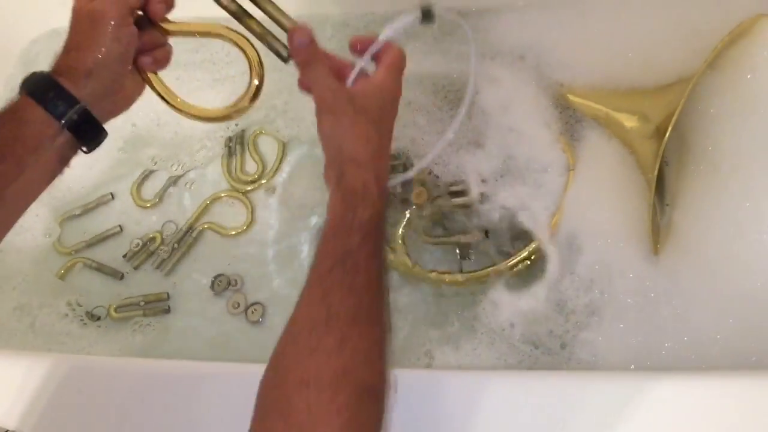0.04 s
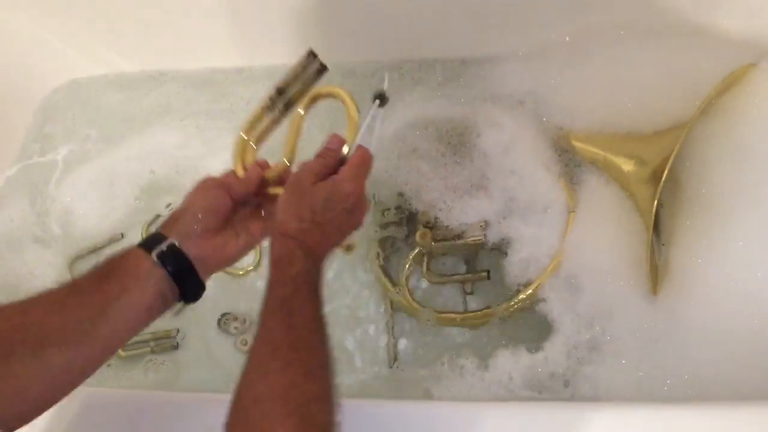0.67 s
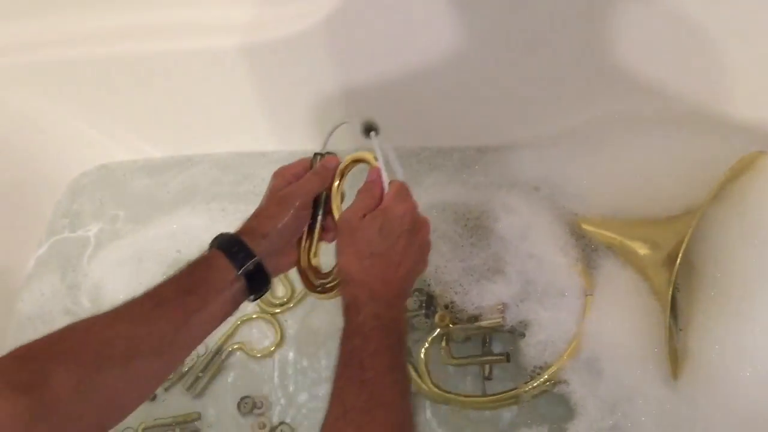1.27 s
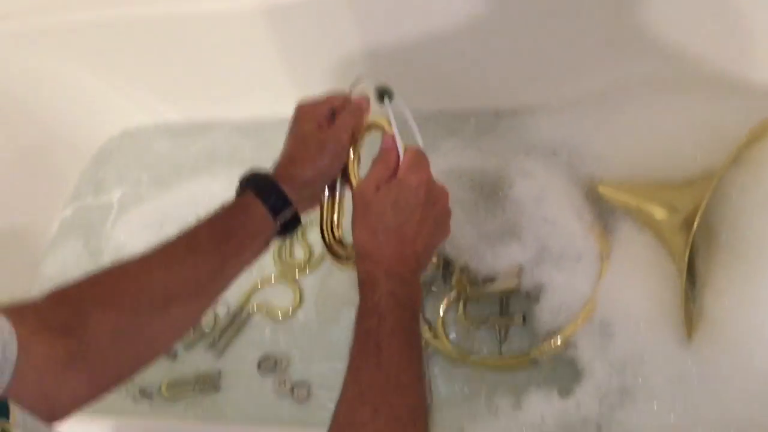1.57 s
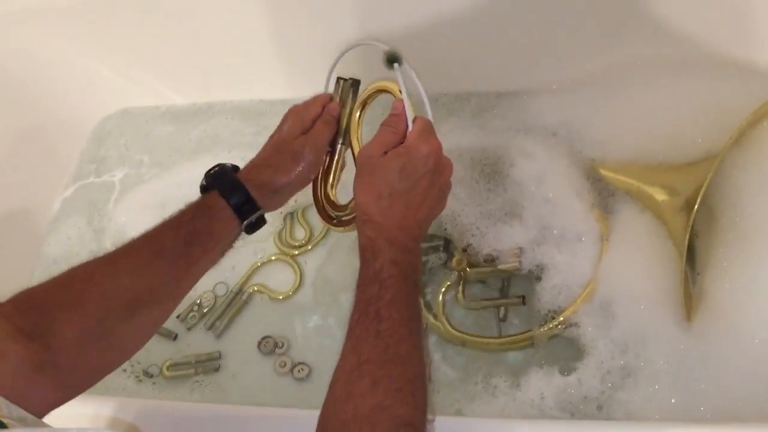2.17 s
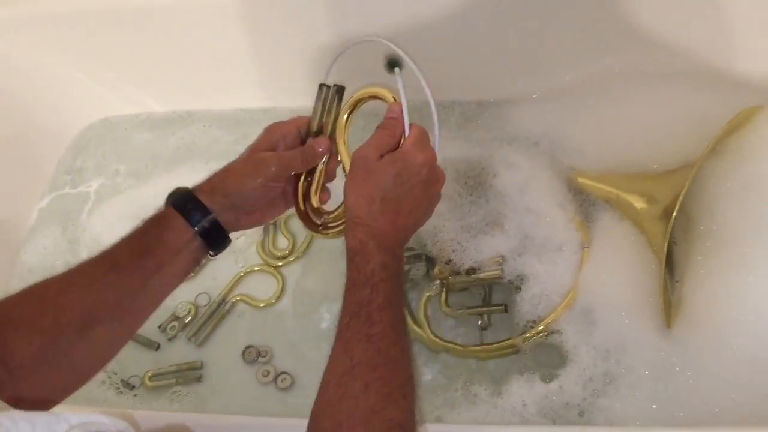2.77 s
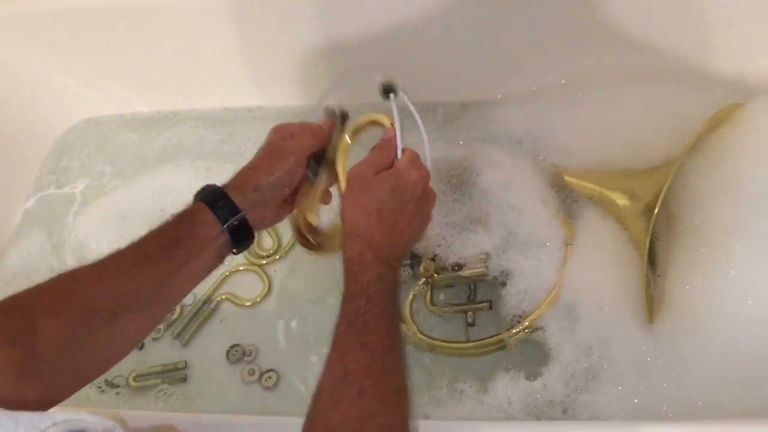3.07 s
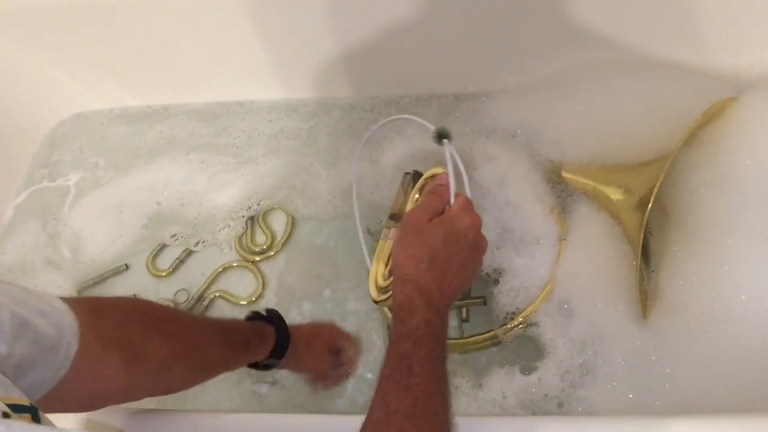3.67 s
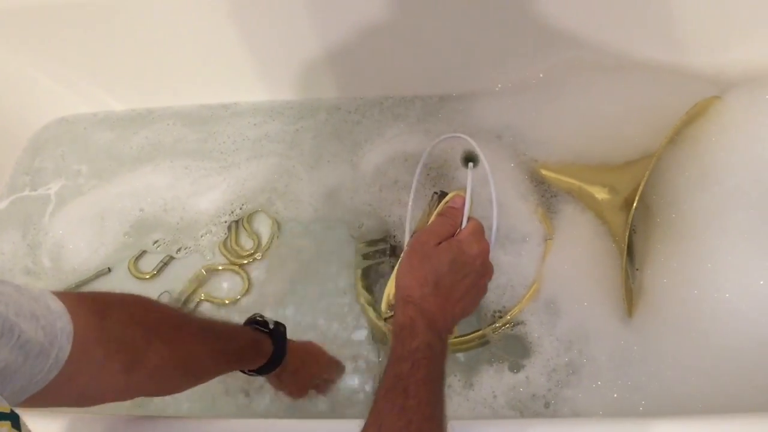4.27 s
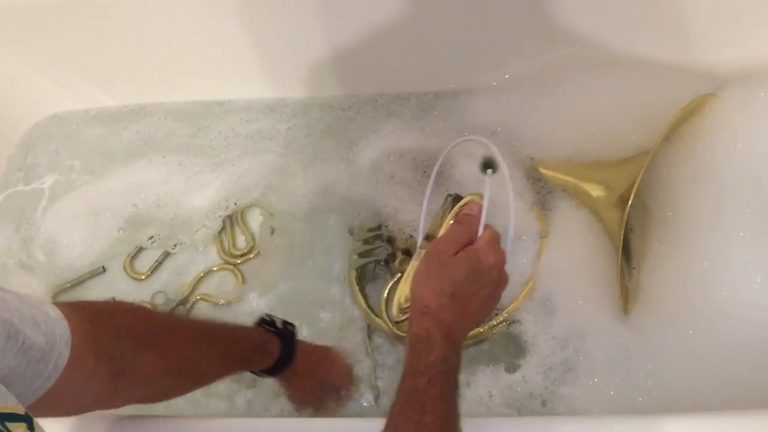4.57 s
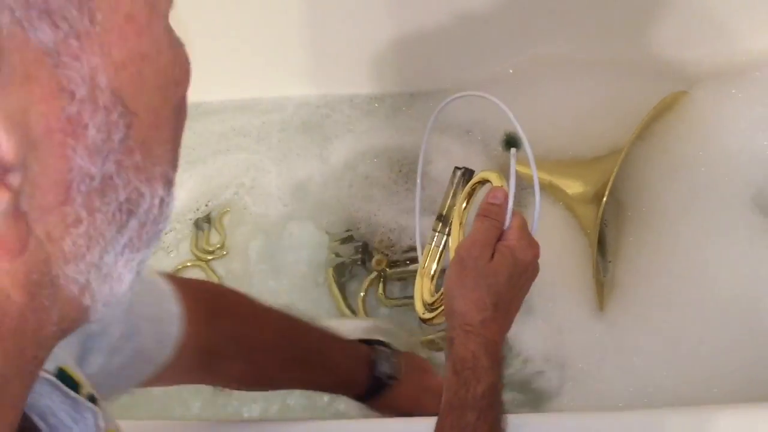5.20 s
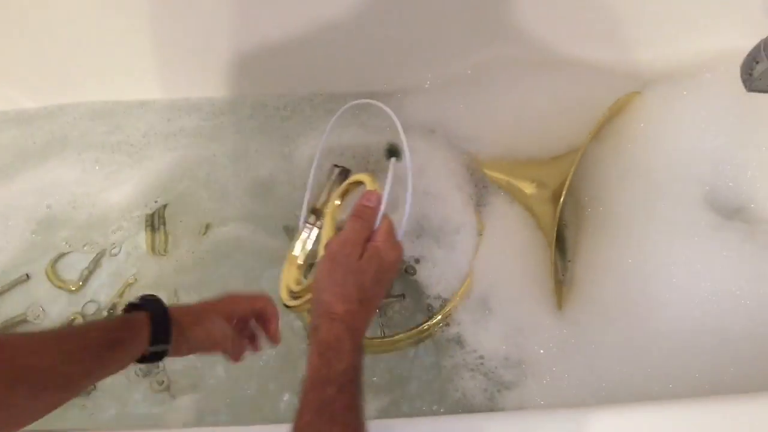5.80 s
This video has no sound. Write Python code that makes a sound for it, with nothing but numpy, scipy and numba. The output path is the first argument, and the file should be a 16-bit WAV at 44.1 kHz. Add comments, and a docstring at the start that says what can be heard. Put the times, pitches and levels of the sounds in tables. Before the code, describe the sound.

The sound opens with a hand splashing out of a filled bathtub: bright slaps, bubbly plops and spray during the first half second, with soft low thumps from the tub underneath. Wet brass tubing clinks lightly at about 0.4 and 0.8 seconds. From 1 to 3.5 seconds it is much quieter, with only a few isolated drips, tiny metal ticks and a faint low room rumble with hiss. At about 3.6 seconds the hand starts stirring the water again, making a run of uneven splashes, gurgles and falling droplets, strongest around 4.2 to 4.5 seconds. Deeper sloshes follow between 5 and 5.5 seconds, then a few small splashes and plops near 5.8 seconds. Everything is heard from one microphone beside the tub, with the short echo of a small, hard bathroom.

```python
"""A small hard bathroom, one microphone by a filled tub in which hands rinse brass tubing.
A hand lifts out of the water, a few drops fall, then it stirs and splashes. The water is heard as
ringing air bubbles of all sizes, slaps and fine spray; the wet tubing ticks and clinks. The tub walls
and the room echo these sounds, while soft thumps of the tub and a faint room tone lie underneath."""
import sys
import numpy as np
from scipy import signal
from scipy.fft import rfft, irfft, next_fast_len
from scipy.io import wavfile
from scipy.ndimage import uniform_filter1d
from numba import njit

SR = 44100
rng = np.random.default_rng(int(sys.argv[2]) if len(sys.argv) > 2 else 0)


def persist_wave(psi):
    """Save psi, clipped to +-1, as 16-bit WAV."""
    counts = np.round(np.clip(psi, -1, 1) * 32767).astype(np.int16)
    wavfile.write(sys.argv[1], SR, np.atleast_2d(counts).T)


N = 257788
TIME = np.arange(N) / SR


def undb(db):
    """Decibels to gain."""
    return 10 ** (np.asarray(db) / 20)


def unit(x):
    """Scale to rms 1."""
    return x / np.sqrt(np.mean(x ** 2))


def at_hz(hz, points):
    """Read (Hz, value) points on a log-frequency axis."""
    f, value = np.transpose(points)
    return np.interp(np.log(np.maximum(hz, 1)), np.log(f), value)


def shaped(x, gain):
    """Filter by a gain that is a function of frequency."""
    size = next_fast_len(len(x) + SR // 4)
    hz = np.arange(size // 2 + 1) * SR / size
    return irfft(rfft(x, size) * gain(hz), size)[:len(x)]


def resonance(f, hz, width):
    """Response of one resonance, gain 1 at its centre."""
    return 1j * f * width / (hz ** 2 - f ** 2 + 1j * f * width)


def fade(t, t60):
    """Exponential decay by 60 dB in t60 seconds."""
    return np.exp(-np.log(1000) * t / t60)


def add(out, start, sound):
    """Mix a sound in at a start time in seconds."""
    i = max(int(start * SR), 0)
    out[i:i + len(sound)] += sound[:max(N - i, 0)]


@njit
def ring_bubbles(starts, hz, t60, gain, glide, swell_cycles):
    """Bubbles ring as damped sines that swell, then rise in pitch as they near the surface."""
    out = np.zeros(N)
    for k in range(len(starts)):
        first, length = int(starts[k] * SR), t60[k] * SR
        phase, amplitude, decay = 0., gain[k], np.exp(-6.9 / length)
        for i in range(min(int(length), N - first)):
            phase += 2 * np.pi * hz[k] * (1 + glide[k] * i / length) / SR
            amplitude *= decay
            swell = min(phase / (2 * np.pi * swell_cycles[k]), 1.)
            out[first + i] += amplitude * np.sin(phase) * swell ** 2 * (3 - 2 * swell)
    return out


def swarm(spectrum, count, cycles, scatter_db, glide):
    """Bubbles of random sizes, born at random moments, each ringing for about `cycles`; rms 1."""
    when, pitch, life, loudness, rise = rng.random((count, 5)).T
    low, high = spectrum[0][0], spectrum[-1][0]
    hz = low * (high / low) ** pitch
    t60 = cycles * (.5 + life) / hz
    boost_db = -scatter_db * np.log(np.maximum(loudness, np.exp(-4)))  # a few stand out
    gain = undb(at_hz(hz, spectrum) + boost_db) / np.sqrt(t60)
    swell_cycles = np.full(count, 1.71)
    return unit(ring_bubbles(when * N / SR, hz, t60, gain, glide * rise, swell_cycles))


def surge(starts, rises, falls, levels_db):
    """Each stroke swells steadily and dies away; overlapping strokes add in power."""
    power = np.zeros(N)
    for start, rise, fall, db in zip(starts, rises, falls, levels_db):
        t = TIME[:2 * SR] + max(-start, 0)
        envelope = undb(db) * np.minimum(t / rise, 1) * fade(np.maximum(t - rise, 0), fall)
        add(power, start, envelope ** 2)
    return np.sqrt(power)


def stirring():
    """The hand folds in air and throws spray; deep strokes make large bubbles and heave the water."""
    # Spectra of small and large bubbles, spray, droplets falling back and water heaving against the tub.
    # Each row: frequency in Hz, relative level in dB.
    small_spectrum = [(820, -7.5), (1050, 4.5), (1450, 6.5), (1900, 2), (2500, 2.5), (3200, -8)]
    large_spectrum = [(480, -11), (560, -11), (680, -6.5), (850, -5)]
    spray_spectrum = [(2800, 7.5), (4500, 1), (7000, -6), (11000, -8.5), (16000, -12)]
    droplet_spectrum = [(2600, -9), (4000, 7.5), (6000, 6.5), (8500, 4), (11000, 0.5), (14000, 5)]
    heave_spectrum = [(70, -10), (112, -8), (160, -1), (200, -1), (240, -2), (320, 1), (470, 0)]
    # Strokes of hand or tubing through the water. Each row: start in seconds, rise and fall (t60) in
    # seconds, level of the small bubbles in dB, then large bubbles, heave and spray in dB relative to it.
    strokes = [(-.05, 0.03, 0.45, -37.5, -15.5, -1, -4), (0.021, 0.02, 0.59, -46, -25, -28, 8.5),
               (0.109, 0.031, 0.15, -36, -28, -13, 3.5), (0.183, 0.0077, 0.48, -37, -2, 5.5, -5),
               (0.4, 0.005, 0.46, -52.5, 2, 9.5, -8), (0.578, 0.0032, 0.23, -52.5, -12.5, -30, -19),
               (0.687, 0.043, 0.51, -70.5, -4, -26, 4.5), (.8, 0.61, 1.4, -77.5, 3, -3, -6),
               (2.58, 0.045, 0.33, -73.5, 1, -9, -11), (3.563, 0.015, 0.4, -68, -15, 2.5, 23.5),
               (3.649, 0.008, 0.72, -42.5, -45, -44, -1.5),
               (3.715, 0.0036, 0.37, -33.5, -12.5, -23.5, -10.5),
               (3.844, 0.022, 0.28, -42.5, 0, -13.5, -4.5), (3.913, 0.015, 0.49, -42, -11.5, -22, -5.5),
               (4.043, 0.0069, 0.79, -44.5, -5, -13, -1), (4.149, 0.046, 0.29, -28.5, -12, -21, -6.5),
               (4.359, 0.039, 1.1, -56.5, -13, -2.5, 7.5), (4.451, 0.026, 0.36, -30.5, -8.5, -9, -9.5),
               (4.663, 0.02, 0.6, -36, -5.5, -10.5, -9.5), (4.78, 0.047, 0.99, -42.5, -29, -25, -13),
               (4.86, 0.059, 0.44, -41, -42, -25, -5), (4.984, 0.011, 0.16, -41, -5.5, 5, -5.5),
               (5.108, 0.043, 0.74, -45.5, -4, -10, -6), (5.279, 0.003, 0.66, -34, -4.5, -4, -11),
               (5.344, 0.055, 0.69, -34.5, -4, -5, -9), (5.697, 0.02, 0.29, -42, -47, -43, -5.5)]
    small = swarm(small_spectrum, count=4500, cycles=28, scatter_db=2.9, glide=.3)
    large = swarm(large_spectrum, count=1100, cycles=22, scatter_db=2, glide=.25)
    spray = swarm(spray_spectrum, count=9000, cycles=7, scatter_db=2.6, glide=.15)
    droplets = swarm(droplet_spectrum, count=2200, cycles=30, scatter_db=3.2, glide=.15)
    heave = swarm(heave_spectrum, count=1500, cycles=10, scatter_db=1.2, glide=.2)
    thrown_water = unit(spray + undb(-3) * droplets)
    start, rise, fall, db, large_db, heave_db, spray_db = np.transpose(strokes)
    # Spray flies first, bubbles form later; the body of water follows last and settles sooner.
    small_lag_s, large_lag_s, heave_lag_s = 0.00069, 0.001, 0.0129
    return (thrown_water * surge(start, rise, fall, db + spray_db)
            + small * surge(start + small_lag_s, rise, fall, db)
            + large * surge(start + large_lag_s, rise, fall, db + large_db)
            + heave * surge(start + heave_lag_s, rise, 0.73 * fall, db + heave_db))


def plops():
    """Single bubbles and falling drops swell, chirp upwards and die away."""
    # Each row: start in seconds, pitch in Hz, peak in dB, t60 in seconds, rise as a share of the pitch.
    bubbles = [(0.098, 1245, -20.5, 0.03, 0.15), (.102, 1965, -25, 0.029, 0.17), (.137, 726, -34, 0.04, .1),
               (0.152, 1333, -26.5, 0.042, 0.16), (.185, 2484, -14, 0.016, 0.17),
               (.188, 680, -21.5, 0.047, 0.12), (.222, 562, -33, 0.046, .15),
               (0.2878, 2910, -17.5, 0.0082, 0.22), (.408, 257.6, -28, 0.06, 0.16),
               (.879, 800, -49, 0.017, 0.16), (1.77, 1340, -42.5, 0.041, 0.06),
               (2.8722, 2330, -33, 0.0095, 0.13), (2.88, 1365, -50, 0.054, 0.09),
               (2.882, 342, -57, 0.11, 0.056), (3.351, 830, -52.5, 0.015, .1),
               (3.654, 3630, -30.5, 0.03, .2), (3.66, 1251, -23.5, 0.038, 0.075),
               (3.706, 2030, -26, 0.02, 0.33), (3.863, 1333, -30, 0.038, 0.2),
               (3.933, 8800, -38, 0.0067, .1), (3.953, 4770, -27, 0.0088, 0.2),
               (3.963, 3280, -28, 0.012, 0.22), (4.02, 2400, -28.5, 0.018, 0.16),
               (4.021, 7900, -29, .006, .08), (4.047, 910, -26.5, 0.028, 0.082),
               (4.056, 985, -23.5, 0.034, 0.091), (4.179, 1560, -22.5, 0.057, 0.27),
               (4.191, 763, -27.5, 0.044, .1), (4.195, 968, -23.5, 0.034, 0.18),
               (4.202, 1430, -20, 0.027, 0.2), (4.203, 1893, -16, 0.031, 0.25),
               (4.23, 2145, -18, 0.032, 0.19), (4.451, 1016, -18, 0.051, 0.041),
               (4.456, 1620, -33, 0.05, .12), (4.464, 885, -23, 0.11, 0.056),
               (4.663, 2754, -32, 0.0064, 0.17), (4.675, 1477, -25, 0.016, 0.34),
               (4.7, 7100, -28, 0.011, 0.22), (4.706, 699, -33.5, 0.061, 0.2),
               (4.715, 1440, -30, 0.021, 0.18), (4.815, 947, -29, 0.028, 0.12),
               (4.867, 2010, -34, 0.045, 0.18), (4.897, 1530, -28.5, 0.021, 0.26),
               (4.927, 1113, -33.5, 0.13, 0.23), (5.001, 178, -40, 0.034, 0.41),
               (5.055, 207, -36, 0.066, 0.55), (5.2354, 2140, -24.5, 0.011, 0.38),
               (5.264, 1070, -22, 0.016, 0.22), (5.283, 960, -31.5, 0.013, 0.43),
               (5.305, 188, -32, 0.087, 0.077), (5.321, 296, -27.5, 0.057, 0.64),
               (5.45, 164, -35.5, 0.067, 0.14), (5.465, 245, -35, 0.071, 0.32),
               (5.724, 1660, -34.5, 0.034, 0.36), (5.753, 2370, -32, 0.012, 0.16),
               (5.778, 1370, -33, 0.05, 0.3)]
    start, hz, db, t60, glide = np.array(bubbles, float).T.copy()
    swell_share = 0.098  # of the ring time
    gain = undb(db) / fade(swell_share, 0.94)  # makes up for the decay during the swell
    return ring_bubbles(start, hz, t60, gain, glide, swell_share * t60 * hz)


def bursts(impacts, t60, width, low_cut, rise_s):
    """Each impact is a dying crowd of tiny clicks; width and low_cut are shares of its centre in Hz."""
    out, t = np.zeros(N), TIME[:SR // 4]
    scatter_db = 6
    for start, db, hz in impacts:
        clicks = rng.standard_normal(len(t)) * undb(scatter_db * rng.standard_normal(len(t)))
        crackle = shaped(clicks, lambda f: resonance(f, hz, width * hz) ** 2)
        highpass = signal.butter(2, low_cut * hz, "high", fs=SR, output="sos")
        crackle = signal.sosfilt(highpass, crackle)
        envelope = fade(t, t60) * (1 - np.exp(-t / rise_s))
        envelope /= envelope.max()
        add(out, start, undb(db) * unit(crackle * envelope) * np.sqrt(np.mean(envelope ** 2)))
    return out


def slaps():
    """The hand and falling water slap the surface."""
    # Each row: start in seconds, level at the crest in dB, centre in Hz.
    surface_hits = [(.0995, -30, 1700), (.139, -23, 1930), (.188, -20, 2300), (.877, -50.5, 554),
                    (1.593, -51.5, 1530), (3.654, -39.5, 3670), (3.72, -27, 1470), (3.74, -34, 1920),
                    (4.048, -38, 1250), (4.2, -25, 1900), (4.452, -33.5, 1060), (4.481, -25.5, 2280),
                    (4.546, -28.5, 2340), (4.987, -33, 1230), (5.112, -40, 1010), (5.236, -32.5, 1870),
                    (5.283, -32, 1410), (5.587, -36.5, 2340), (5.6775, -38.5, 2420), (5.7795, -32.5, 1370)]
    return bursts(surface_hits, t60=0.031, width=0.84, low_cut=0.6, rise_s=0.0017)


def ticks():
    """Drops and wet tubing strike with short, sharp ticks."""
    # Each row: start in seconds, level at the crest in dB, centre in Hz.
    sharp_hits = [(.056, -29, 8900), (.0998, -26.5, 6000), (.139, -27, 8740), (.1855, -19.5, 4620),
                  (.1885, -19.5, 11300), (.26, -31, 10200), (.2875, -23, 5350), (.331, -57, 9200),
                  (.4046, -39, 2900), (.459, -60, 11000), (.5, -49, 3450), (.508, -55, 13000),
                  (.569, -49.5, 12200), (.594, -51.5, 11000), (.699, -53, 10900), (1.151, -59.5, 9040),
                  (.788, -31, 8600), (1.593, -54, 5000), (1.765, -49.5, 7500), (2.373, -58, 8060),
                  (2.868, -55, 9960), (3.4738, -55.5, 6270), (3.574, -32, 7980), (3.667, -30, 7360),
                  (3.681, -29.5, 5000), (3.928, -34, 5860), (3.953, -32, 5500), (4.052, -25.5, 4840),
                  (4.2, -33.5, 11100), (4.233, -22, 4770), (4.3985, -40, 10600), (4.478, -32, 9500),
                  (4.537, -33, 9800), (4.7, -34, 6850), (4.897, -34.5, 4670), (4.9895, -29, 8500),
                  (5.236, -39, 11000), (5.29, -28.5, 6950), (5.59, -44.5, 7940), (5.679, -48, 8500),
                  (5.7105, -39.5, 8600), (5.779, -27, 11300)]
    return bursts(sharp_hits, t60=0.01, width=1.1, low_cut=0.083, rise_s=0.00047)


def thumps():
    """The tub and collapsing water give soft pushes that swell into a few low swings."""
    # Each row: start in seconds, level in dB, pitch in Hz.
    pushes = [(0.178, -25, 107), (0.217, -25, 116), (0.236, -24.5, 73), (0.279, -22, 148),
              (0.302, -26.5, 84), (0.366, -30, 129.6), (0.417, -29.5, 80), (0.877, -41, 176),
              (0.889, -28.5, 64), (1.611, -48.5, 227), (1.639, -48.5, 131), (2.044, -43.5, 110),
              (3.36, -35.5, 67.5), (3.394, -40, 83.5), (4.202, -29.5, 156.4), (4.251, -35.5, 67),
              (4.368, -42, 128), (4.486, -37, 184), (4.699, -33.5, 71), (5.741, -44.5, 118)]
    out, t = np.zeros(N), TIME[:SR // 2]
    rise_s = 0.014
    envelope = fade(t, t60=0.13) * (1 - np.exp(-t / rise_s))
    for start, db, hz in pushes:
        add(out, start, undb(db) * np.sin(2 * np.pi * hz * t) * envelope)
    return out


def clinks():
    """Brass tubes touch and ring their modes, each with a slightly different strength every time."""
    # Each row: start in seconds, level in dB.
    touches = [(0.4054, -52), (0.7873, -44.5), (1.592, -59), (2.373, -79.5)]
    # Modes damped by the hands. Each row: pitch in Hz, relative level in dB, t60 in seconds.
    brass_modes = [(678, -12, 0.26), (1620, -2, 0.046), (2830, -4.5, 0.026), (4250, -8, 0.025),
                   (5940, -15.5, 0.0041), (6200, 9, 0.015), (7100, 3, 0.009), (8500, 8, 0.011),
                   (8700, -17, 0.005), (11400, -29, 0.0046), (13500, -2, .006)]
    out, t = np.zeros(N), TIME[:SR // 3]
    for start, level_db in touches:
        modes = [undb(db + 2 * rng.standard_normal()) * np.sin(2 * np.pi * hz * t) * fade(t, t60)
                 for hz, db, t60 in brass_modes]
        add(out, start, undb(level_db) * sum(modes))
    return out


def diffuse(echo):
    """Even out an echo so that it has unit power gain in every narrow band."""
    power = uniform_filter1d(np.abs(rfft(echo)) ** 2, size=60)
    hz = np.linspace(0, SR / 2, len(power))
    return shaped(echo, lambda f: np.interp(f, hz, power) ** -.5)


def echo_at_spot():
    """What comes back from one spot in the tub: wall reflections, a short flutter and the room's tail."""
    # Reverberation of the bathroom. Each row: frequency in Hz, t60 in seconds.
    room_decay = [(100, .44), (400, .35), (1200, .31), (2500, .26), (6000, .225), (16000, .18)]
    # First reflections off the water surface and tub walls. Each row: delay in milliseconds, gain.
    reflections = [(1.1, 0.07), (2.05, 0.2), (3.0, 0.16), (4.9, 0.024), (10.9, 0.26)]
    t = TIME[:SR // 2]
    tail_rise_s, flutter_rise_s = 0.0029, 0.00048
    noise, tail = rng.standard_normal(len(t)), 0
    for band_hz, t60 in room_decay:
        band = [(hz, float(hz == band_hz)) for hz, _ in room_decay]
        tail = tail + shaped(noise, lambda f: at_hz(f, band)) * fade(t, t60)
    tail *= 1 - np.exp(-t / tail_rise_s)
    flutter = rng.standard_normal(len(t)) * fade(t, t60=0.0099) * (1 - np.exp(-t / flutter_rise_s))
    echo = undb(0.5) * diffuse(tail) + undb(-1.5) * diffuse(flutter)
    for ms, gain in reflections:
        delay_ms = ms * (1 + .05 * rng.standard_normal())  # varies from spot to spot
        echo[int(delay_ms * SR / 1000)] += gain
    return echo


def bathroom(sound, spots):
    """The air in the tub rings, and the echo changes colour as the hands move from spot to spot."""
    # Air resonances between the tub walls. Each row: centre in Hz, width in Hz, level in dB.
    air_modes = [(148, 29, 4), (761, 22.7, -4.5), (893, 8.7, -4), (997, 27, -1.5), (1278, 150, -14),
                 (1487, 26, -8.5), (2010, 130, -14.5), (2490, 40, -11)]
    direct = shaped(sound, lambda f: 1 + sum(undb(db) * resonance(f, hz, width)
                                             for hz, width, db in air_modes))
    out, position = direct, np.linspace(0, spots - 1, N)
    for spot in range(spots):
        echo = echo_at_spot()
        nearness = np.sqrt(np.maximum(1 - np.abs(position - spot), 0))
        out = out + signal.fftconvolve(direct * nearness, echo)[:N]
    return out / np.sqrt(1 + np.sum(echo ** 2))


def room_tone():
    """The room's steady low rumble and faint hiss."""
    # Each row: frequency in Hz, relative noise density in dB.
    spectrum = [(26, -33.5), (42, -2.5), (54, 5), (66, -4), (96, -12), (222, -13.5), (338, -18), (363, -20),
                (525, -20.5), (1340, -27), (1750, -25), (2350, -27), (13100, -36.5), (16000, -38)]
    noise = shaped(rng.standard_normal(N), lambda f: undb(at_hz(f, spectrum)))
    return undb(-64) * unit(noise)


def scene():
    """At the microphone, in mono: water and tubing with their echo, over dry thumps and room tone."""
    rinsing = stirring() + plops() + slaps() + ticks() + clinks()
    return (bathroom(rinsing, spots=8) + thumps() + room_tone())[None]


def record(dry):
    """The recorder cuts the top steeply."""
    top_hz = 16300
    return signal.sosfilt(signal.ellip(10, .2, 70, top_hz, fs=SR, output="sos"), dry)


dry = scene()
out = record(dry)
persist_wave(out)
```